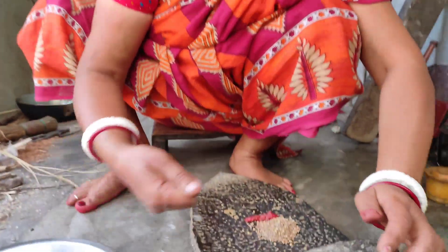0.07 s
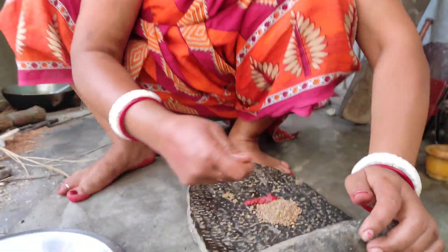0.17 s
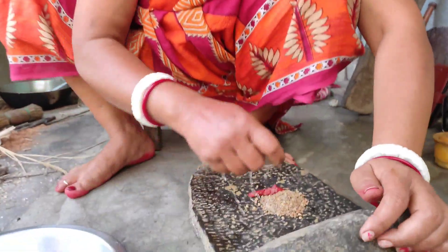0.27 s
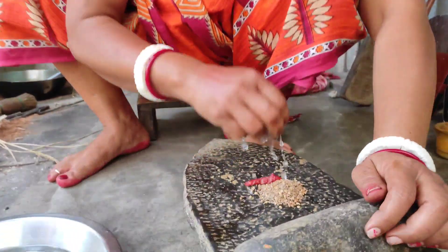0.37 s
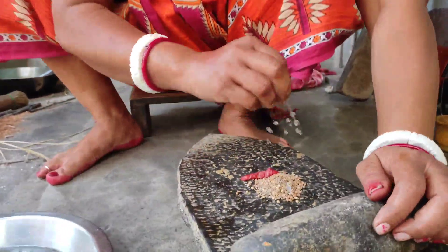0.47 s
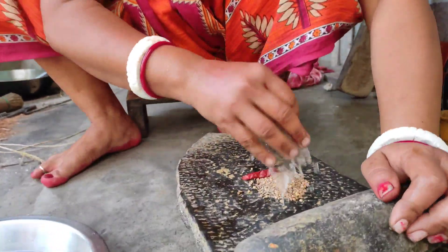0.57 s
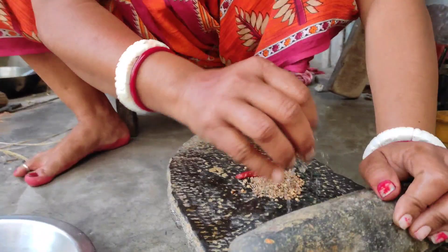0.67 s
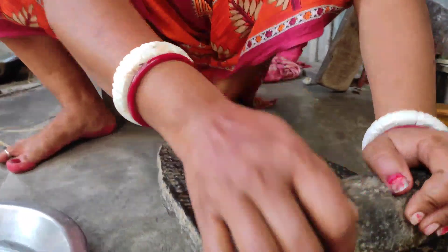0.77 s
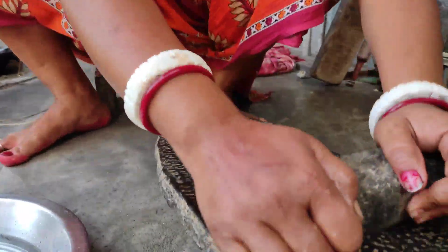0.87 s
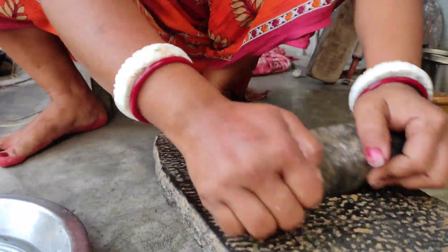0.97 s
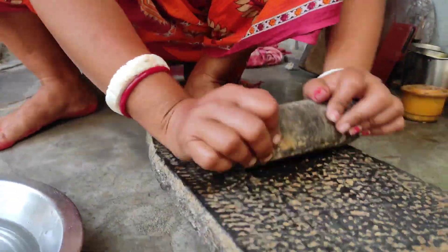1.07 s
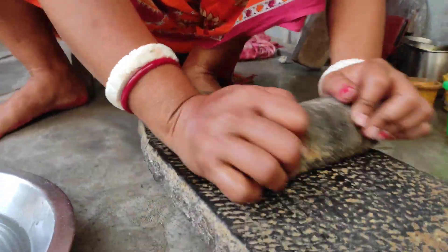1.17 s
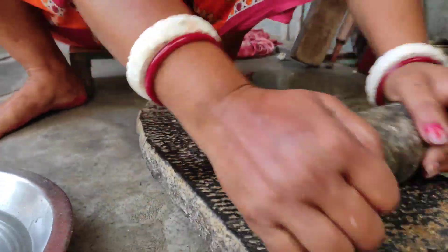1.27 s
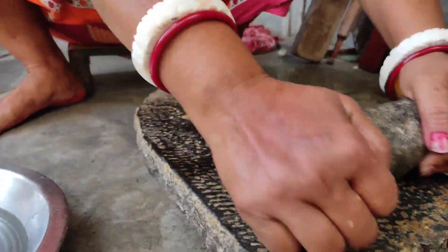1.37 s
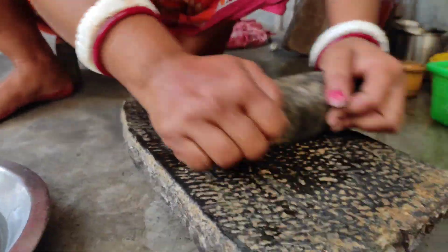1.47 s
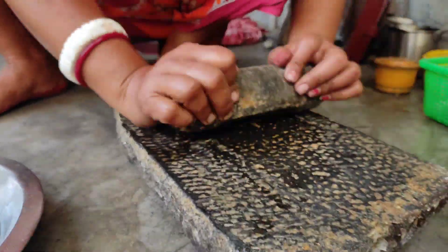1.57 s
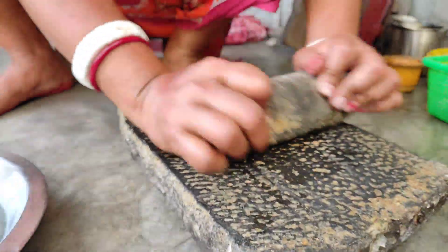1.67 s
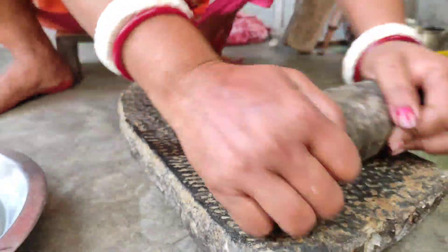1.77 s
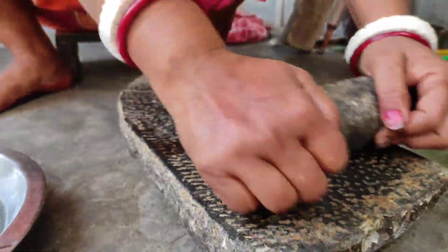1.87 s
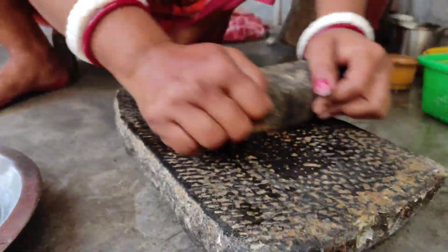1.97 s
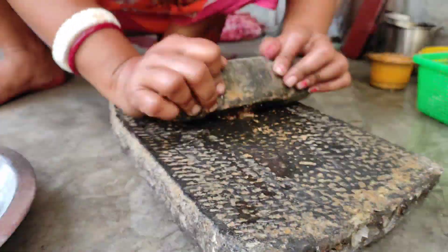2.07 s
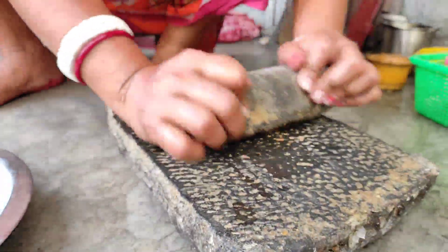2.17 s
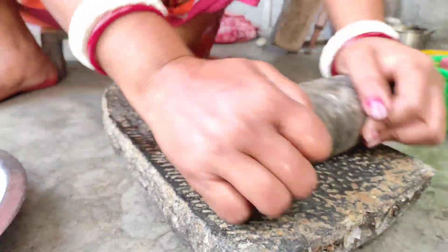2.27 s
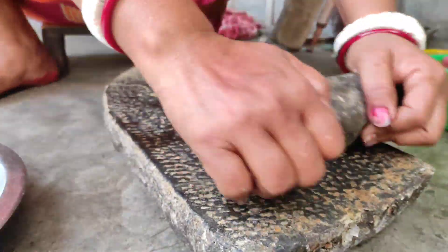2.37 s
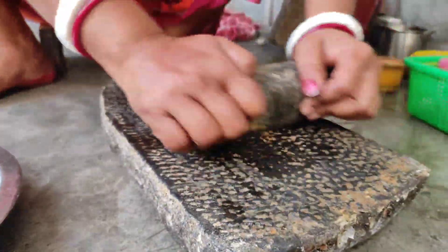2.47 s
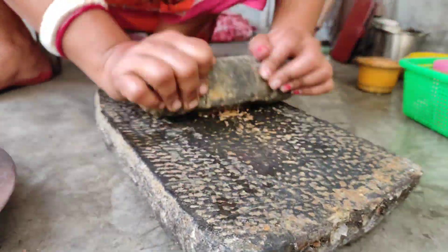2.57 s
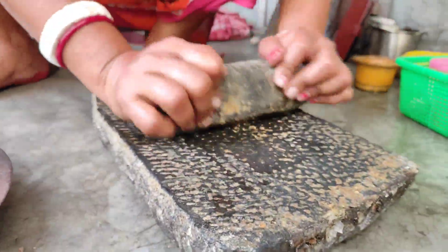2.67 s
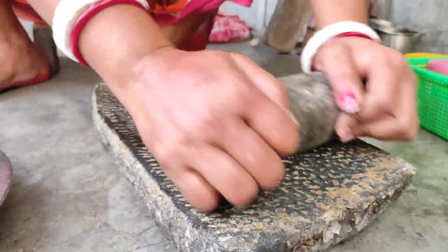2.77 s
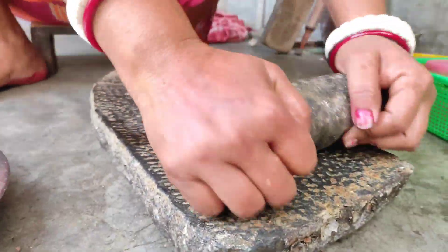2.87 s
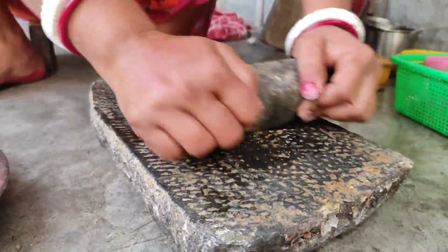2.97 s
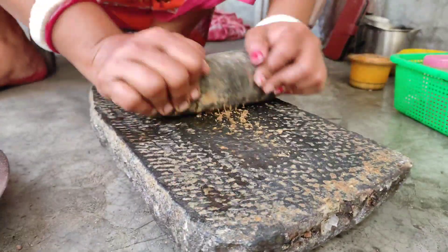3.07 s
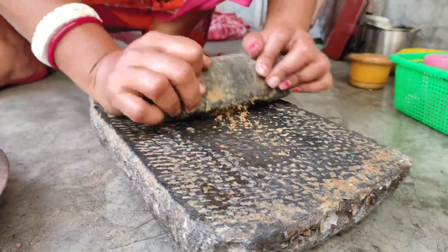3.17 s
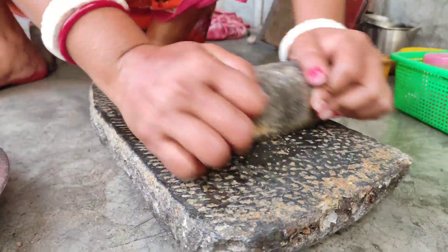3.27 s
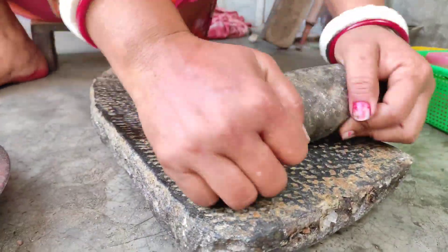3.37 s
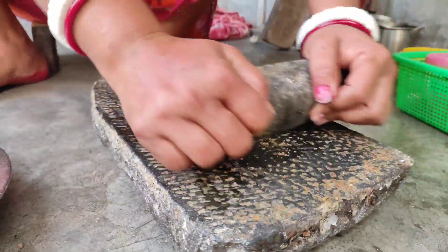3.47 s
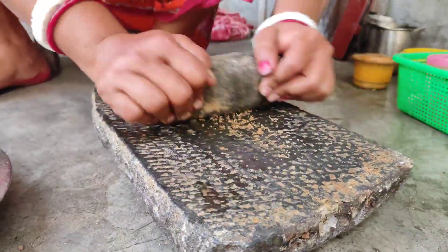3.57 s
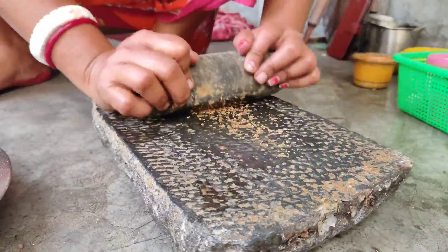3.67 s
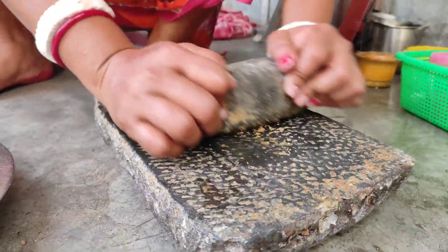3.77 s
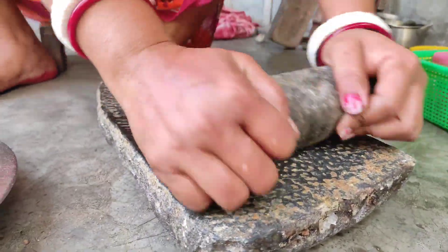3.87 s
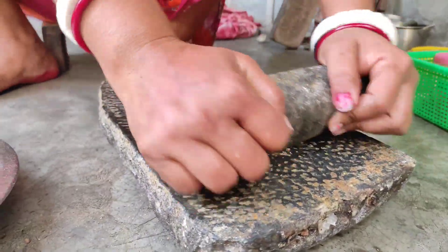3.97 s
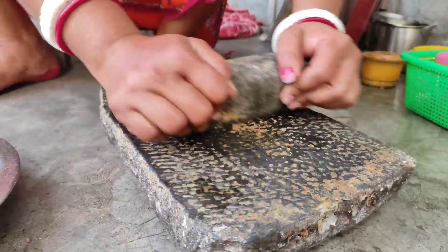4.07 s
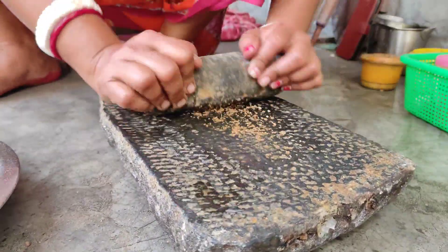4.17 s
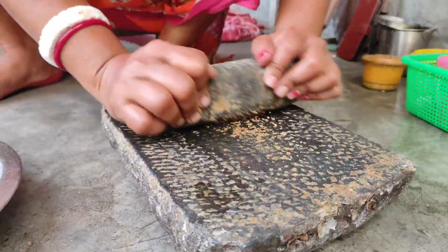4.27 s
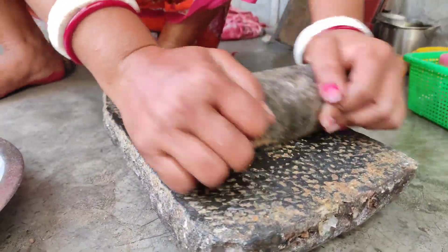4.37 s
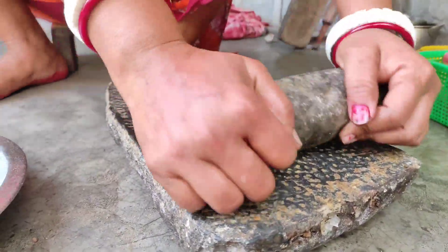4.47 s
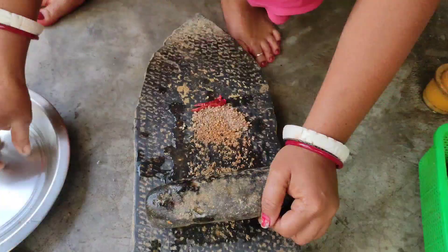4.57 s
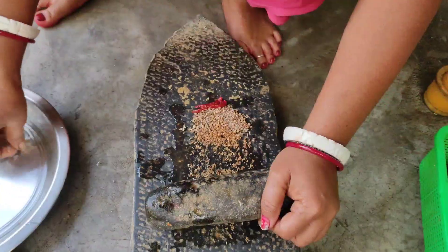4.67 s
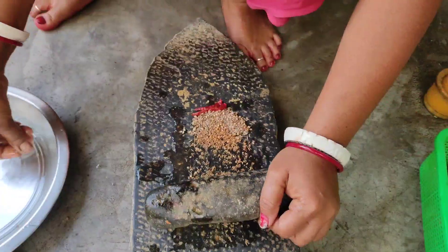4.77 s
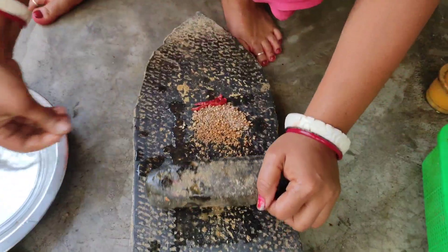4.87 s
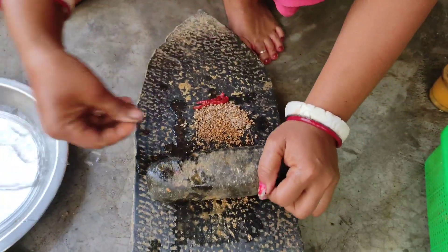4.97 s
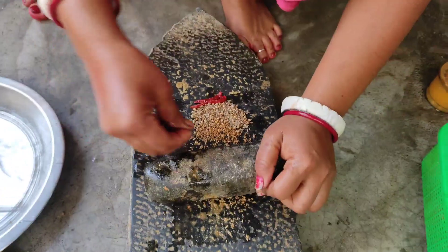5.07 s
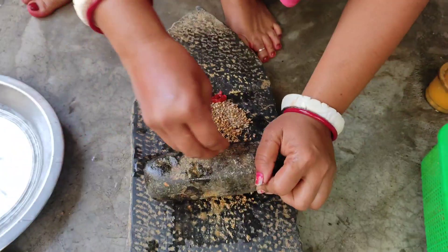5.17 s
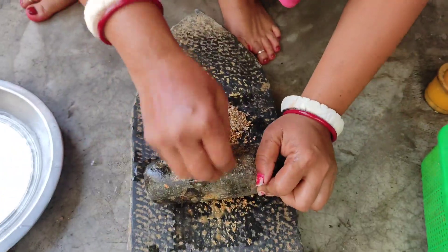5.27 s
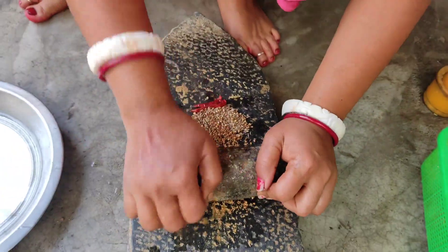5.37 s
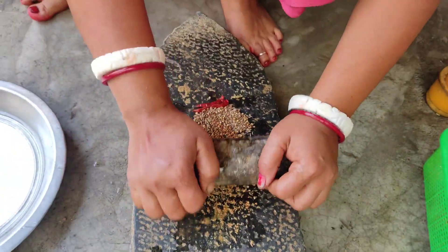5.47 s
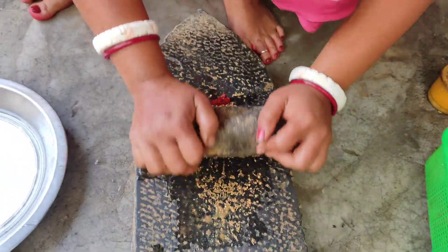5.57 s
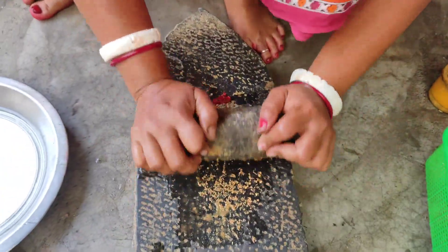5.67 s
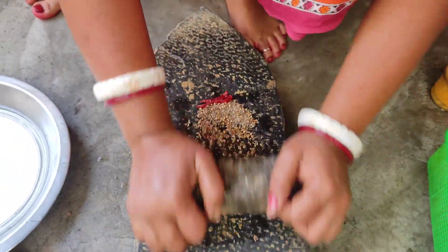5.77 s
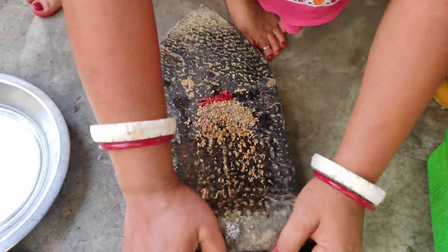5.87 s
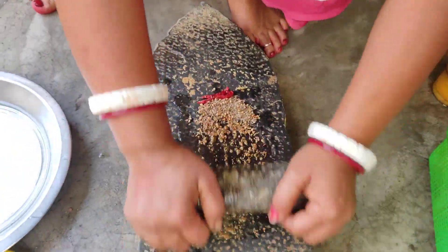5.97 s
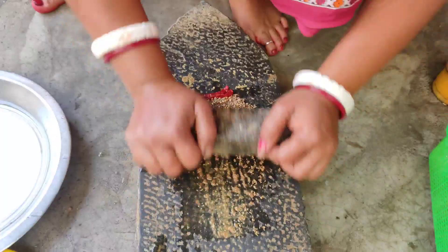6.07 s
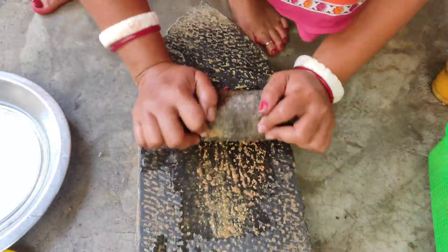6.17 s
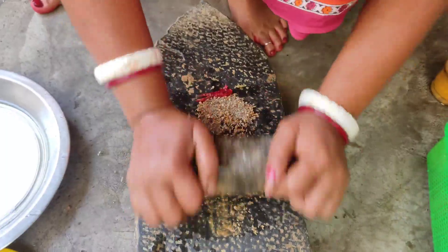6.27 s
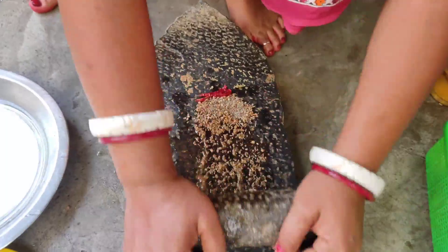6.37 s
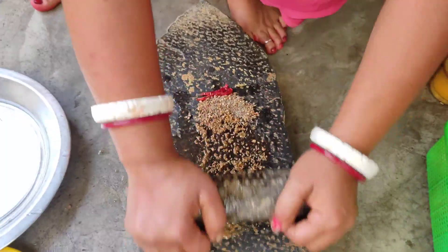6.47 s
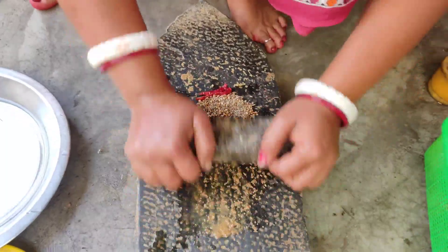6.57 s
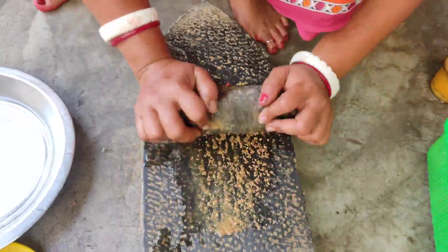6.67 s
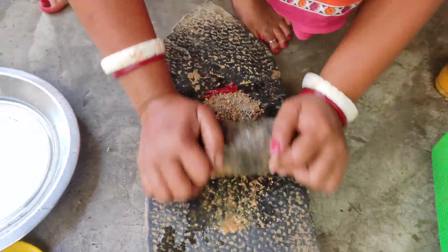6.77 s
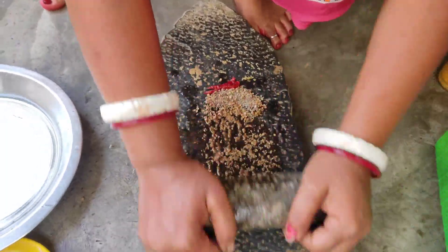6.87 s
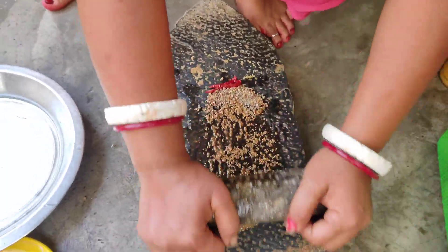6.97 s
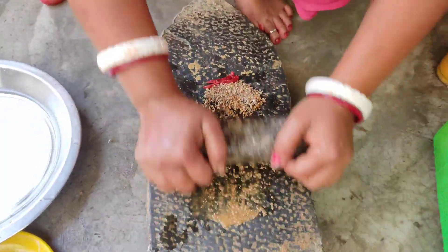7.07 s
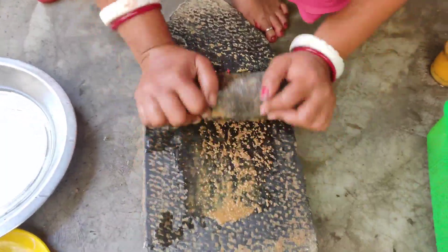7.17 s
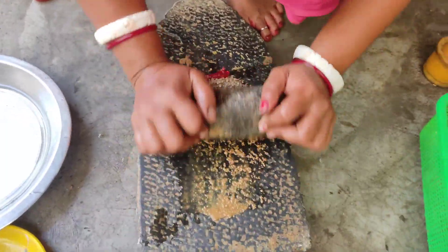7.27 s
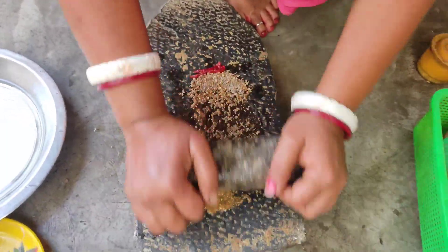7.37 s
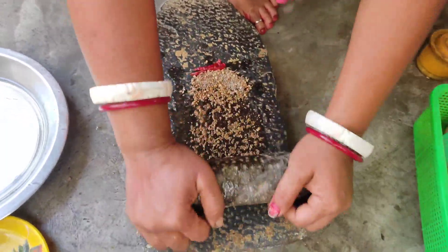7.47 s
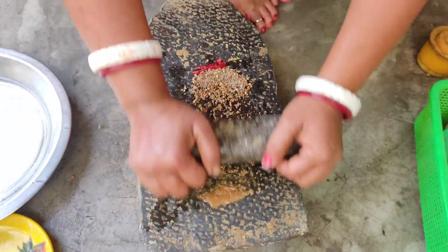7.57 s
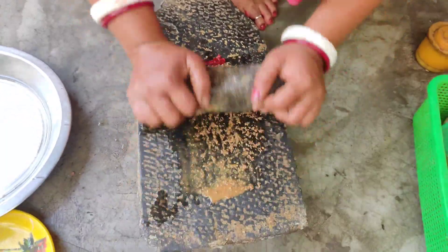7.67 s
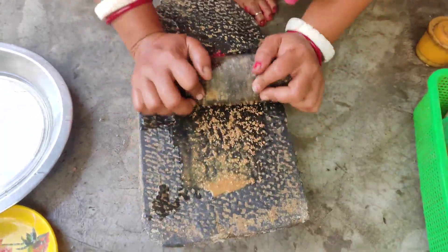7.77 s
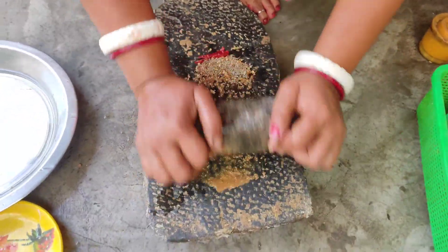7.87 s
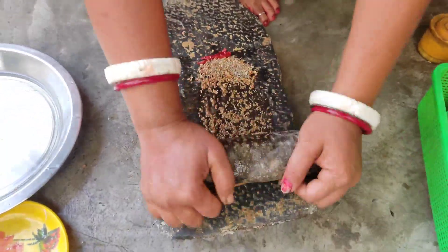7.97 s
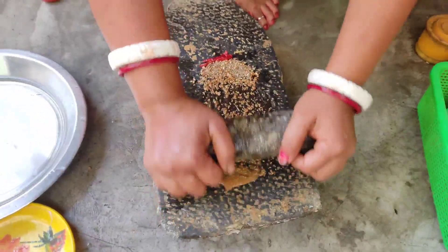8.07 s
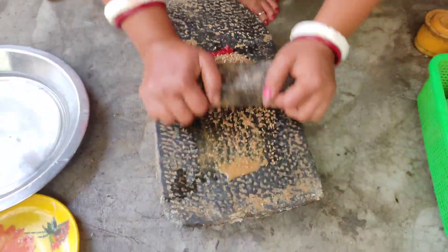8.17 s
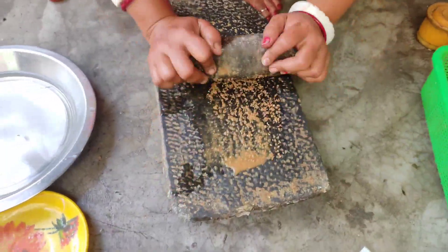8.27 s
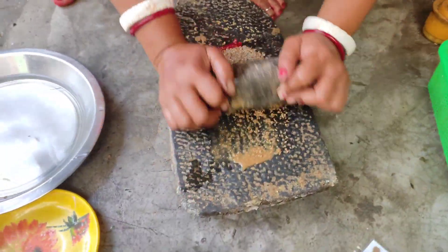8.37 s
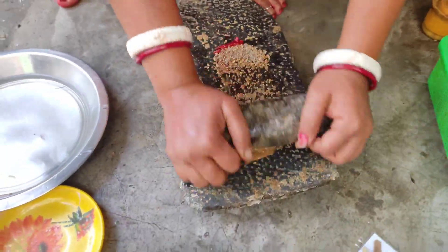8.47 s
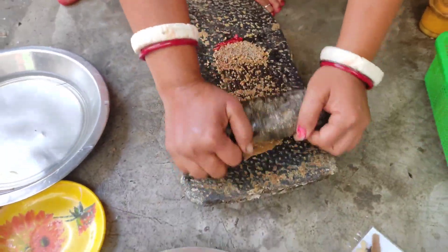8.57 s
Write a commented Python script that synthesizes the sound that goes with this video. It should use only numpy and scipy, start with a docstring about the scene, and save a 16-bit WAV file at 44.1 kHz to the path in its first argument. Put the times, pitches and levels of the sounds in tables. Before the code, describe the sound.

A stone roller knocks and scrapes rhythmically back and forth over a rough stone slab, then, after a brief pause, grinds gritty seeds more softly.

```python
"""Faint room noise and a few light ticks; then a stone roller is pushed to and fro over a pecked stone slab. In
the first spell it knocks and scrapes on bare stone during the strokes: dying modes and resonant noise. Grains
and noise make slab rumble, roller ring and the gritty hiss of seeds; ring and hiss are strongest toward the far
end. After a pause with small handling sounds, a rustle and a thin tone, softer strokes go on over a bed of
seeds."""
import sys
import numpy as np
from scipy import signal
from scipy.fft import rfft, irfft, next_fast_len
from scipy.io import wavfile
from scipy.ndimage import uniform_filter1d

SR = 44100
rng = np.random.default_rng(int(sys.argv[2]) if len(sys.argv) > 2 else 0)


def to_wav(s):
    """Save 16-bit WAV."""
    ch = np.atleast_2d(s).T  # columns
    pcm = np.round(np.clip(ch, -1, 1) * 32767)  # PCM
    wavfile.write(sys.argv[1], SR, pcm.astype(np.int16))


N = 380450
TIME = np.arange(N) / SR
RING_TIME = np.arange(SR // 3) / SR
ATTACK = SR // 133  # samples, 7.5 ms

# bending modes of the stones in contact: mode_hz, level_db (relative), t60_s
BENDING_MODES = [(1440, 0, 0.039), (1526, -9.5, 0.039), (1290, -23, 0.018)]


def gain_of(db):
    """Decibels to amplitude."""
    return 10 ** (np.asarray(db) / 20)


def evened(x, size=None):
    """Scales to rms 1, judged over the first samples if a size is given."""
    return x / np.sqrt(np.mean(x[..., :size] ** 2) + 1e-20)


def read(points, hz):
    """Interpolates a table of (Hz, value) on a log-frequency axis."""
    point_hz, value = np.transpose(points)
    return np.interp(np.log(hz + 1), np.log(point_hz + 1), value)


def add(mix, s, sound):
    """Mixes a stereo sound in at time s."""
    part = mix[:, max(round(s * SR), 0):][:, :sound.shape[1]]
    part += sound[:, :part.shape[1]]


def pan(left_db):
    """Gains of both channels for a left-minus-right difference."""
    return gain_of(np.array([[left_db], [-left_db]]) / 2)


def coloured(x, points):
    """Gives a pair of signals a spectrum and the likeness of two close microphones, at rms 1."""
    # left-right likeness: band_hz, likeness (0-1)
    likeness = [(30, 0), (130, 1), (650, 0.9), (1400, 0.12), (3000, 0.13), (7000, 0), (15000, 0)]
    size = next_fast_len(x.shape[1])
    hz = np.fft.rfftfreq(size, 1 / SR)
    a, b = rfft(x, size)
    same = np.clip(read(likeness, hz), -1, 1)
    pair = np.array([a, same * a + np.sqrt(1 - same ** 2) * b])
    return evened(irfft(pair * gain_of(read(points, hz)), size)[:, :x.shape[1]])


def resonate(x, hz, width_hz):
    """A one-pole resonance of gain 1 whose centre can follow a curve."""
    turn = np.exp(2j * np.pi * np.cumsum(hz * np.ones(x.shape[1])) / SR)
    r = np.exp(-np.pi * width_hz / SR)
    return 2 * (turn * signal.lfilter([1 - r], [1, -r], x / turn + 1e-18)).real


def wander(rate_hz):
    """Smooth random curve of rms 1, with little above rate_hz."""
    hz = np.fft.rfftfreq(N, 1 / SR)
    return evened(irfft(rfft(rng.standard_normal(N)) / (1 + (hz / rate_hz) ** 4), N))


def air():
    """Faint hiss and rumble of the room: coloured noise with a drifting level."""
    # spectrum of the room noise: band_hz, density_db (per Hz, relative)
    air_colour = [(12, -29), (20, 7.5), (54, -3), (80, -11), (114, -2.5), (143, -13.5), (692, -20.5),
                  (1240, -20), (1350, -21), (2470, -18.5), (3550, -27), (4950, -12.5), (8850, -29),
                  (13800, -34), (15000, -36)]
    # drift of the room noise: time_s, level_db (relative)
    air_drift = [(0.5, 6.5), (3.1, 7.5), (4.75, 3.5), (5.1, 6.5), (6.6, 3.5), (8.63, 3)]
    level_db = -62.5 + np.interp(TIME, *np.transpose(air_drift))
    return gain_of(level_db) * coloured(rng.standard_normal((2, N)), air_colour) * pan(-4)


def taps(snap=10):
    """Ticks and dull bumps of moving hands: resonant noise bursts; returns direct sound and room send."""
    # handling sounds: start_s, level_db (before pan), centre_hz, width_hz, t60_s, room_db (send)
    tap_rows = [(0.149, -45.5, 5280, 900, 0.074, -8), (0.477, -52, 252, 90, 0.13, 3.5),
                (.480, -53, 1490, 3060, 0.21, 6.5), (.632, -61, 272, 150, 0.2, 2),
                (.634, -58.5, 720, 500, 0.15, 8.5), (2.206, -46, 240, 34.88, 0.16, -20),
                (4.81, -62, 1188, 900, .12, -5.5), (5.03, -60, 55, 50, .25, -9),
                (5.075, -58, 520, 204, 0.1, -6), (5.1827, -38, 2100, 1690, 0.016, -15.5),
                (5.181, -53, 257, 160, 0.051, -10), (5.245, -57.5, 1490, 151, .06, -23),
                (5.479, -53.5, 6700, 200, .02, -15.5)]
    out, far = np.zeros((2, 2, N))
    for s, db, hz, width_hz, t60_s, room_db in tap_rows:
        push = rng.standard_normal(len(RING_TIME)) + 0.5 * rng.standard_normal((2, len(RING_TIME)))
        push *= gain_of(-60 * RING_TIME / t60_s)
        push[:, 0] += snap  # the first contact, nearly all there is to the shortest ticks
        body = resonate(resonate(push, hz, width_hz), hz, 2 * width_hz)
        sound = gain_of(db) * evened(body, 2 * ATTACK)
        add(out, s, sound * pan(-9))
        add(far, s, gain_of(room_db) * sound)
    return out, far


def room(x, onset_s=0.0045):
    """Dense reflections from hard walls: a noise tail, each band dying at its own speed."""
    # reverberation: band_hz, t60_s
    room_decay = [(150, .35), (800, 0.2), (3000, .3), (8000, 0.32), (15000, 0.29)]
    hz, t, z = signal.stft(rng.standard_normal((2, SR // 2)), SR, nperseg=256)
    fade = gain_of(-60 * t / read(room_decay, hz)[:, None])
    tail = signal.istft(z * fade, SR, nperseg=256)[1]
    # silent up to onset_s, full at twice that
    tail *= np.clip(np.arange(tail.shape[1]) / SR / onset_s - 1, 0, 1)
    return signal.fftconvolve(x, tail / np.linalg.norm(tail[0]), axes=1)[:, :N]


def stroke_levels(rows, end_s, rest_speed, turn_speed, rumble_law, ring_law, hiss_law,
                  rumble_place, ring_place, rumble_focus_db, ring_focus_db, hiss_focus_db,
                  push_ease, pull_ease, blend_s=0.065):
    """Level curves in dB: powers of the swinging roller's speed, weighted by its place on the slab."""
    starts, *columns = np.transpose(rows)
    travel = np.interp(TIME, np.append(starts, end_s), np.arange(len(rows) + 1))
    stroke = np.minimum(travel.astype(int), len(rows) - 1)
    blend = round(blend_s * SR)
    rumble, rubbed, crush, seed_place = (uniform_filter1d(column[stroke], blend) for column in columns)
    # the push is nearly even, the pull back starts quicker
    travel = stroke + (travel - stroke) ** np.where(stroke % 2, pull_ease, push_ease)
    place = (1 - np.cos(np.pi * travel)) / 2  # 0 near end, 1 far end
    # it almost rests at the near end, but keeps rocking through the far turn
    rocking = rest_speed + (turn_speed - rest_speed) * place ** 2
    speed_db = 20 * np.log10(np.hypot(np.sin(np.pi * travel), rocking))
    lifted_db = -60 * np.clip(np.maximum(starts[0] - TIME, TIME - end_s) / blend_s, 0, 1)
    return (rumble + lifted_db + rumble_law * speed_db - rumble_focus_db * (place - rumble_place) ** 2,
            rubbed + lifted_db + ring_law * speed_db - ring_focus_db * (place - ring_place) ** 2,
            crush + lifted_db + hiss_law * speed_db - hiss_focus_db * (place - seed_place) ** 2)


def grains(per_s, spread_db, smooth):
    """Sparse clicks of unequal size over a bed of noise."""
    size = gain_of(spread_db * np.minimum(rng.exponential(1, N), 4)) * (rng.random(N) < per_s / SR)
    return evened(size * rng.standard_normal((2, N))) + smooth * rng.standard_normal((2, N))


def patchy(x, depth_db):
    """Gives noise random level patches a few hundred Hz wide, some 20 ms long, at rms 1."""
    z = signal.stft(x, SR, nperseg=512, noverlap=384)[2]
    patches = rng.standard_normal(z.shape[1:])
    for _ in range(2):
        patches = uniform_filter1d(uniform_filter1d(patches, size=5, axis=0), size=8, axis=1)
    z = z * gain_of(depth_db * evened(patches))
    return evened(signal.istft(z, SR, nperseg=512, noverlap=384)[1][:, :N])


def crunches(per_s=110, spread_db=4, cycles=11, low_hz=2400, high_hz=11000, count=24):
    """Single husks snap, each with a short ping at one of count pitches."""
    out, t = np.zeros((2, N)), RING_TIME[:ATTACK]
    snaps = round(per_s * TIME[-1] / count)
    for hz in np.geomspace(low_hz, high_hz, count):
        ping = np.exp(2j * np.pi * hz * t - np.log(100) * hz * t / cycles)  # -40 dB after these cycles
        for when, size, turn_left, turn_right in rng.random((snaps, 4)):
            ports = np.exp(2j * np.pi * np.array([[turn_left], [turn_right]]))
            level = gain_of(-spread_db * np.log(size + 0.041))
            add(out, when * TIME[-1], level * (ports * ping).real)
    return evened(out)


def strokes(levels, rumble_colour, hiss_colour, rumble_db, ring_db, hiss_db, ring_hz, bump_db,
            flicker_db, patch_db, grain_db, rumble_left_db, ring_left_db, hiss_left_db, lag_s,
            ring_flicker_db=3.0, crunch_db=-10):
    """Pits in the slab excite rumble and roller ring, while grit is crushed beneath into hiss."""
    rumble, rubbed, crush = levels
    bumps = bump_db * wander(51)
    slab = coloured(grains(per_s=700, spread_db=-1, smooth=0.93), rumble_colour)
    slab *= gain_of(rumble + rumble_db + bumps)
    # the ring rises a little when the roller is pressed hard, as the hiss level tells
    pressure = np.clip((crush - crush.max()) / 25 + 1, 0, 1)
    hz = ring_hz * (1 + 0.039 * pressure)
    rub = grains(per_s=900, spread_db=2.5, smooth=0.89)
    roller = evened(resonate(resonate(rub, hz, 70), hz, 240))
    # the ring's level flickers at random
    roller *= gain_of(rubbed + ring_db + bumps + ring_flicker_db * wander(22))
    grit = patchy(coloured(grains(per_s=2500, spread_db=grain_db, smooth=1.0), hiss_colour), patch_db)
    grit += gain_of(crunch_db) * crunches()
    grit *= gain_of(crush + hiss_db + flicker_db * wander(47))
    grit[0] = np.roll(grit[0], round(lag_s * SR))  # the left microphone is farther from the contact
    return slab * pan(rumble_left_db) + roller * pan(ring_left_db) + grit * pan(hiss_left_db)


def scrape(width_hz=100, judder_db=2, ends_db=24):
    """Bare stone slides on stone: tiny slips drive a gliding main ring and fixed resonances."""
    # slides during the strokes: start_s, loudest_s, end_s (nominal; two rows out of order),
    # level_db (main ring), start_hz, end_hz
    slides = [(.93, 1.177, 1.31, -33, 834, 814), (1.36, 1.42, 1.55, -29, 972, 852),
              (1.57, 1.614, 1.82, -32, 822, 864), (1.90, 1.931, 2.35, -46.5, 870, 840),
              (2.06, 2.118, 2.252, -36.5, 796, 878), (2.40, 2.44, 2.55, -43, 910, 805),
              (2.60, 2.623, 2.79, -41, 840, 834), (2.92, 2.956, 3.18, -46, 870, 834),
              (3.09, 3.167, 3.26, -35, 784, 830), (3.46, 3.517, 3.59, -42, 850, 860),
              (3.62, 3.698, 3.67, -33.5, 830, 857), (3.99, 4.026, 4.17, -42, 930, 875),
              (4.19, 4.241, 4.09, -32.5, 791, 828), (4.51, 4.57, 4.67, -34.5, 925.5, 835)]
    # fixed resonances: mode_hz, width_hz, level_db (relative to the main ring)
    slide_modes = [(530, 70, -11), (730, 80, -12), (1040, 90, -13), (1780, 200, -21), (2160, 170, -19),
                   (3430, 170, -21), (4250, 150, -29), (5400, 200, -30), (5950, 400, -22),
                   (11800, 900, -31)]
    # trim above 3 kHz, lower in the end as paste coats the slab: time_s, level_db
    rasp = [(1, -0.5), (2.2, 2), (3.2, -5.5), (4.7, -4.5)]
    out, judder = np.zeros((2, N)), gain_of(judder_db * wander(70))
    for start, loudest, end, db, first_hz, last_hz in slides:
        slips = rng.standard_normal((2, SR // 2))
        t = start + TIME[:slips.shape[1]]
        hz = np.interp(t, [start, end], [first_hz, last_hz])
        growl = evened(resonate(resonate(slips[:1], hz, width_hz), hz, 2 * width_hz))
        for mode_hz, mode_width_hz, mode_db in slide_modes:
            # only the low modes are alike at both microphones
            heard = slips[:1] if mode_hz < BENDING_MODES[0][0] else slips
            rasp_db = np.interp(loudest, *np.transpose(rasp)) * (mode_hz > 3000)
            mode = resonate(resonate(heard, mode_hz, mode_width_hz), mode_hz, mode_width_hz)
            growl = growl + gain_of(mode_db + rasp_db) * evened(mode)
        away = np.interp(t, [start, loudest, end], [-1, 0, 1])
        swell = gain_of(db - ends_db * away ** 2) * np.clip(10 * (1 - abs(away)), 0, 1)
        add(out, start, growl * swell)
    return out * judder * pan(-1.3)


def contacts():
    """Unfolds each chatter into its first contact and ever weaker, duller rebounds."""
    # drops on the slab: start_s, level_db (before trims), ring_hz, bending_db and clack_db (relative), chatter_s
    drops = [(1.177, -23.5, 887, 3, -18.5, 0), (1.205, -19.5, 810, -1.5, -21, 0),
             (1.22, -26.5, 825, 12.5, -5, 0.0073), (1.226, -23.5, 840, 11, -10, 0),
             (1.316, -28, 814, 8, -11, 0), (1.35, -16, 966, 1, -4, 0),
             (1.362, -16.5, 913, -9.5, -7.5, .013), (1.437, -15, 875, -8.5, -19.5, 0.044),
             (1.616, -19, 833, -16, -25, .019), (1.669, -20.5, 864, -23, -11.5, .012),
             (1.716, -19.5, 845, -3, -17, 0), (1.893, -17, 880, 2, 1, 0),
             (1.906, -14.5, 865, 4.5, -3, .015), (1.931, -17.5, 876, -12, -13, 0.038),
             (2.123, -22, 865, -20, -19, 0), (2.151, -21.5, 835, -37.5, -16, 0),
             (2.402, -18, 885, -7, -8, .015), (2.439, -17, 890, -11, -21, 0.037),
             (2.619, -35.5, 806, -30, -14, 0), (2.644, -19.5, 818, -11, -13.5, .024),
             (2.92, -16.5, 865, -2, -3, 0.037), (2.971, -16.5, 898, -15, -14.5, 0),
             (2.986, -22.5, 917, -18, -25, .013), (3.148, -25, 818, -13.5, -17, 0.028),
             (3.501, -19, 870, -17, -22, 0.019), (3.667, -29, 844, -15, -14.5, 0),
             (3.684, -24, 828, -7, -12.5, .018), (4.008, -20.5, 870, -29, -24, 0.0082),
             (4.045, -20, 895, -13.5, -18, 0.0015), (4.2, -25, 840, -17, -16.5, .023),
             (4.281, -29.5, 824, -3, -8.5, 0), (4.53, -18.5, 867, -3.5, -7, 0.019),
             (4.582, -25, 908, -8, -18.5, 0.031)]
    gap_s, jitter_s, detune = 0.016, 0.0005, 0.022
    weaker_db, softer_db = -3, -2.5  # per rebound
    rows = []
    for s, db, hz, bend, hard, chatter_s in drops:
        rebounds = max(round(chatter_s / gap_s), 0)
        for k, delay_s in enumerate(np.linspace(0, chatter_s, 1 + rebounds)):
            late, off_pitch = rng.standard_normal(2) * (k > 0)
            softer = k * softer_db
            rows.append((s + delay_s + jitter_s * late, db + k * weaker_db,
                         hz * (1 + detune * off_pitch), bend + softer, hard + softer))
    return rows


def ring(modes, shift, rise_s, detune=0.014):
    """Dying modes with random detuning, each out of step between the two microphones."""
    # phase between the microphones: mode_hz, phase_rad
    port_phase = [(100, 3), (950, 0.5), (1430, 1.18), (1800, -1.5), (2100, 2.5), (3400, 3.5), (15000, -3)]
    hz, db, t60_s = np.transpose(modes)[:, :, None]
    chance = rng.standard_normal((4, len(modes), 1))
    lag = read(port_phase, hz) * (1 + 0.25 * chance[0]) / 2
    phase = 2 * np.pi * hz * shift * (1 + detune * chance[1]) * RING_TIME + chance[2]
    fade = gain_of(db + chance[3] - 60 * RING_TIME / t60_s) * (1 - np.exp(-RING_TIME / rise_s))
    return evened(np.array([(fade * np.sin(phase + side * lag)).sum(0) for side in (-1, 1)]), ATTACK)


def knocks(body_db=-2.0, bend_db=-4.5, clack_db=-1, crack_db=-6, crack_t60_s=0.031,
           soft_rise_s=0.0033, hard_rise_s=0.0013, choke_db=9, settle_s=0.004):
    """Each contact rings both stones; harder ones start faster, with more high modes and noise crack."""
    # stones in contact, first row shifted to each contact's ring_hz: mode_hz, level_db (relative), t60_s
    body_modes = [(830, 5, 0.051), (864, -10, 0.17), (862, -22, 0.082), (940, -13.5, 0.036),
                  (681, -30.5, 0.026), (524.6, -7, 0.051), (411, -19, 0.073), (245, -32.5, 0.018)]
    # hard-contact modes, before a 1 % lowering: mode_hz, level_db (relative), t60_s
    clack_modes = [(1790, -3, 0.034), (1968, -4, 0.033), (2130, -12.5, 0.073), (2223, -1, 0.088),
                   (2954, -16.5, 0.15), (3460, -11.5, 0.11), (4220, -24.5, 0.027)]
    # contact noise: band_hz, level_db (relative)
    crack_colour = [(150, -14.5), (500, 4), (1200, -0.5), (2200, -3.5), (3300, -2.5), (4500, -12),
                    (7000, -20), (15000, -43.5)]
    out = np.zeros((2, N))
    hits = contacts()
    gaps_s = np.diff([row[0] for row in hits], append=TIME[-1])
    for (s, db, hz, bend, hard), gap_s in zip(hits, gaps_s):
        shift = np.ones((len(body_modes), 1))
        shift[0] = hz / body_modes[0][0]  # the main ring shifts with the point of contact
        rise_s = np.interp(hard, [-22, -5], [soft_rise_s, hard_rise_s])
        fade = gain_of(-60 * RING_TIME / crack_t60_s) * (1 - np.exp(-RING_TIME / rise_s))
        crack = coloured(rng.standard_normal((2, len(RING_TIME))), crack_colour)
        crack = evened(crack * fade, ATTACK)
        sound = gain_of(body_db) * ring(body_modes, shift, rise_s)
        sound += gain_of(bend + bend_db) * ring(BENDING_MODES, 1, rise_s)
        # the roller settling for its next contact damps what is still ringing
        sound *= gain_of(-choke_db * np.clip((RING_TIME - gap_s) / settle_s + 1, 0, 1))
        clack = gain_of(clack_db) * ring(clack_modes, 0.99, rise_s / 2, detune=0.023)
        sound += gain_of(hard) * pan(-0.9) * (clack + gain_of(crack_db) * crack)
        # a cushioned contact lasts longer and so excites less of the top
        top_hz = np.interp(hard, [-20, -6], [2800, 6000])
        add(out, s, gain_of(db) * signal.lfilter(*signal.butter(2, top_hz, fs=SR), sound))
    return out * pan(-0.7)


def seeds(level_db=-5, rise_s=0.0007):
    """A seed bursts in a snap or longer crumble: uneven coloured noise, dying away."""
    # bursts: start_s, level_db (before level_db trim), t60_s
    bursts = [(1.255, -30, 0.083), (1.301, -31.5, 0.039), (1.486, -29, .035), (1.744, -33, 0.1),
              (1.9679, -35.5, .04), (2.235, -36.5, 0.071), (2.328, -21.5, .16), (2.4673, -30.5, 0.032),
              (2.831, -30, .06), (2.9757, -29, .04), (3.36, -21, .08), (3.4413, -19, .032),
              (3.9779, -19.5, 0.024), (4.404, -35, 0.029), (4.8762, -45, .032), (4.924, -46.5, .032),
              (5.0395, -42, 0.063), (5.244, -44, .028), (5.325, -52, .03), (5.804, -37, .03),
              (5.8548, -25.5, 0.019), (6.3221, -21.5, 0.028), (7.0277, -28.5, .03), (8.0832, -24, .028)]
    # spectrum of a burst: band_hz, level_db (relative)
    burst_colour = [(300, -13), (1200, -9), (1470, 7), (1900, -14.5), (4000, -3), (7200, 11), (9000, 0),
                    (14500, 4.5)]
    out = np.zeros((2, N))
    for s, db, t60_s in bursts:
        crumble = rng.standard_normal((2, len(RING_TIME)))
        crumble *= gain_of(2 * rng.standard_normal(len(RING_TIME)))
        crumble *= 1 - np.exp(-RING_TIME / rise_s)
        burst = coloured(crumble, burst_colour) * gain_of(-60 * RING_TIME / t60_s)
        add(out, s, gain_of(db + level_db) * evened(burst, ATTACK))
    return out * pan(-2)


def rustle(db=-59, clump_db=2):
    """Fingers and cloth brush softly as the hand comes back to the roller: patchy coloured noise."""
    swell = np.interp(TIME, [4.76, 4.82, 5.07, 5.2], [0, 0.6, 1, 0])
    # band_hz, level_db (relative)
    colour = [(50, -17), (110, -5), (200, -5), (500, 2), (900, 4.0), (1250, -13), (1500, 7),
              (1750, -7), (2100, 2), (3000, -7.0), (7000, -10), (14000, -17)]
    brush = patchy(coloured(rng.standard_normal((2, N)), colour), depth_db=2.5)
    return gain_of(db + clump_db * wander(32)) * swell * brush * pan(-5.5)


def faint_tone(db=-67, waver=0.0133, flutter_db=3):
    """A thin sine in the pause, wavering in pitch and level and sinking a little."""
    swell = np.interp(TIME, [5.24, 5.28, 5.56, 5.6], [0, 1, 1, 0])
    hz = np.interp(TIME, [5.25, 5.6], [1245, 1220]) * (1 + waver * wander(65))
    tone = evened(np.sin(2 * np.pi * np.cumsum(hz) / SR))
    return gain_of(db + flutter_db * wander(28)) * swell * tone


def scene():
    """Both spells of grinding, close by, in the room."""
    # push and pull in turn, levels before trims: start_s, rumble_db, ring_db, hiss_db, seed_place (0 near, 1 far)
    first_strokes = [(.92, -52.5, -43.5, -53.5, 0.99), (1.29, -44, -40.5, -43.5, 1),
                     (1.55, -45.5, -38, -47.5, 1), (1.79, -40.5, -45.5, -35.5, 1),
                     (2.04, -47.5, -47.5, -47, 1), (2.28, -42.5, -45.5, -31.5, 0.98),
                     (2.58, -47, -46.5, -40, 0.94), (2.80, -41, -43.5, -31, 0.97),
                     (3.09, -45.5, -49, -38.5, 0.96), (3.32, -41.5, -47, -33, 0.89),
                     (3.62, -45.5, -50, -37, 0.78), (3.87, -41.5, -46.5, -31, 0.99),
                     (4.15, -44, -46, -39, .85), (4.39, -41.5, -44.5, -36.5, 0.75)]
    soft_strokes = [(5.56, -53.5, -46.5, -52.5, 0.48), (5.81, -41.5, -43, -43, 0.84),
                    (6.085, -45.5, -48.5, -44.5, 0.95), (6.315, -41.5, -42, -43, 0.73),
                    (6.60, -45.5, -45.5, -42.5, 0.95), (6.86, -41.5, -46, -40, 0.95),
                    (7.13, -45, -47.5, -45.5, 0.79), (7.38, -41.5, -44, -40, 0.88),
                    (7.65, -46, -48.5, -42.5, 1), (7.91, -43, -44, -40.5, 0.92),
                    (8.19, -47.5, -50.5, -44, 1), (8.42, -42.5, -41, -42.5, 0.41)]
    # spectra of rumble and hiss: band_hz, density_db (per Hz, relative)
    first_rumble, first_hiss = [(35, -40), (60, -13), (150, -4), (237, -3.5), (279, -2), (321, -4.5),
                                (464, -1), (494, -4.5), (534, 2), (724, -11), (887, 0), (1250, -31),
                                (1620, -47), (2750, -120)], [(970, -40), (1650, -12), (2020, -11.5), (2620, -15.5),
                                                      (2920, -5), (3150, -7.5), (3890, -4), (4600, -7),
                                                      (7160, 0.5), (7990, -6), (9700, -7.5), (13700, -4),
                                                      (14600, -31.5), (15000, -34)]
    soft_rumble, soft_hiss = [(35, -40.5), (60, -8), (135, -9), (162, -5.5), (283, -7), (374, 0), (409, -4),
                              (514, -4.5), (561, 2.5), (621, -6), (843, 4), (1020, -11.5), (1250, -15.5),
                              (1620, -48), (2750, -120)], [(970, -44), (1650, -9.5), (1880, -8), (2140, -4.5),
                                                   (2520, -12), (3480, -6), (5130, -4), (6000, -6),
                                                   (7290, 2), (8450, -10), (10600, -8), (13800, -11),
                                                   (14600, -24.5), (15000, -44)]
    first = stroke_levels(first_strokes, end_s=4.709, rest_speed=0.06, turn_speed=0.32,
                          rumble_law=0.86, ring_law=0.65, hiss_law=0.93,
                          rumble_place=0.38, ring_place=0.91,
                          rumble_focus_db=13.5, ring_focus_db=7, hiss_focus_db=45,
                          push_ease=1.01, pull_ease=0.86)
    soft = stroke_levels(soft_strokes, end_s=8.71, rest_speed=0.17, turn_speed=0.37,
                         rumble_law=1.59, ring_law=0.52, hiss_law=1.3,
                         rumble_place=0.75, ring_place=0.99,
                         rumble_focus_db=-1, ring_focus_db=18.5, hiss_focus_db=19,
                         push_ease=1.01, pull_ease=0.84)
    stone = knocks() + scrape() + seeds()
    stone += strokes(first, first_rumble, first_hiss, rumble_db=0.6, ring_db=1.5, hiss_db=1.0,
                     ring_hz=1455, bump_db=-0.06, flicker_db=2.18, patch_db=2.0, grain_db=-0.5,
                     rumble_left_db=-1.5, ring_left_db=1.4, hiss_left_db=-1.0,
                     lag_s=0.0003, crunch_db=-16)
    stone += strokes(soft, soft_rumble, soft_hiss, rumble_db=-0.47, ring_db=1.0, hiss_db=4.0,
                     ring_hz=1426, bump_db=0.1, flicker_db=1.4, patch_db=3.0, grain_db=0.5,
                     rumble_left_db=0.0, ring_left_db=-2.5, hiss_left_db=-3.0,
                     lag_s=0.00005, crunch_db=-18.5)
    near, far = taps()
    return stone + near + room(gain_of(-12.5) * stone + far) + rustle() + air() + faint_tone()


def record(dry):
    """Rounds off the loudest peaks, then cuts the treble above the band limit."""
    edge_hz = 14600
    rounded = dry / (1 + (dry / 0.9) ** 6) ** (1 / 6)
    lowpass = signal.firwin(255, edge_hz, window=("kaiser", 8), fs=SR)
    return signal.oaconvolve(rounded, lowpass[None], "same")


dry = scene()
out = record(dry)
to_wav(out)
```